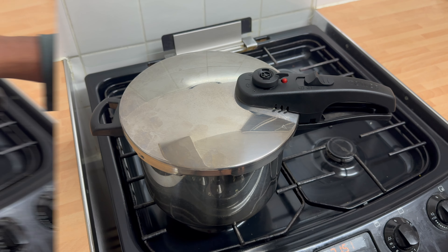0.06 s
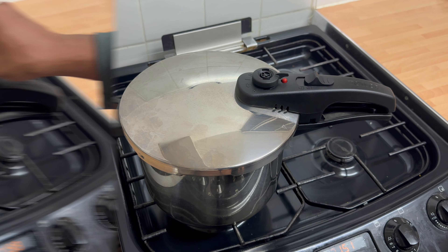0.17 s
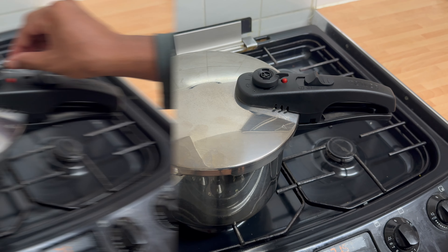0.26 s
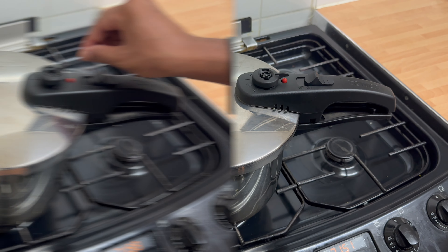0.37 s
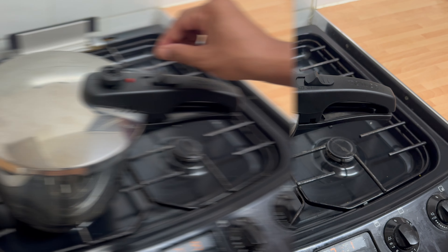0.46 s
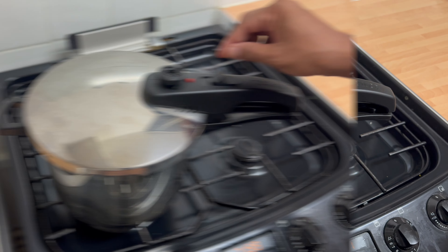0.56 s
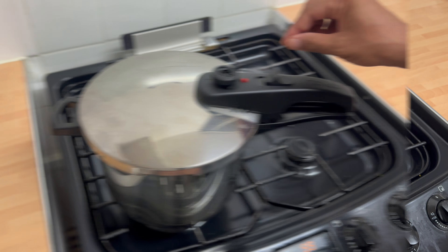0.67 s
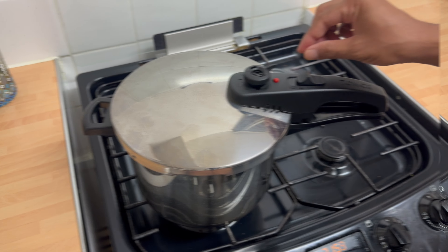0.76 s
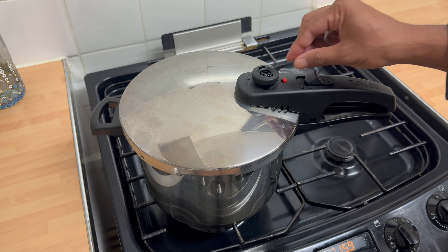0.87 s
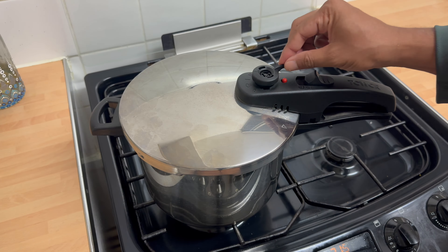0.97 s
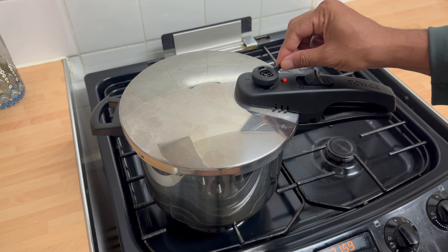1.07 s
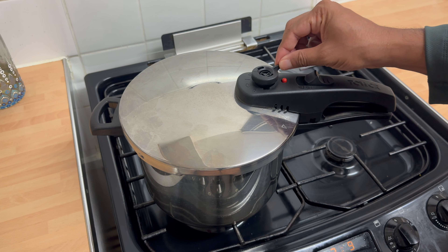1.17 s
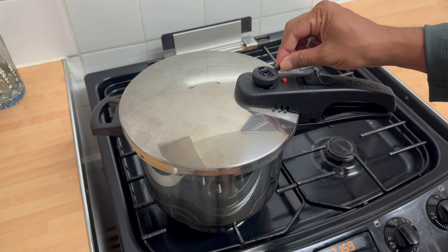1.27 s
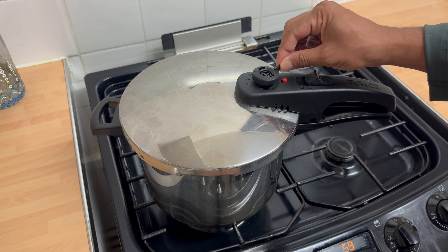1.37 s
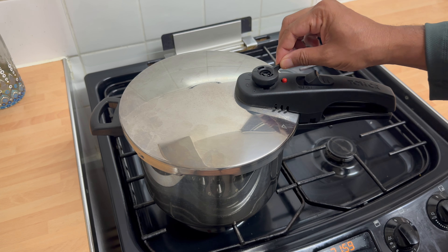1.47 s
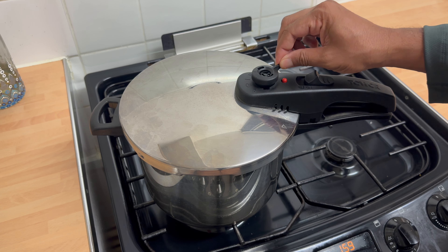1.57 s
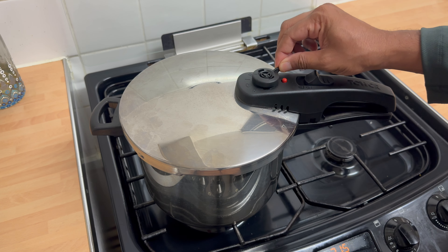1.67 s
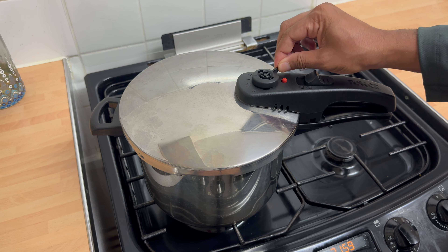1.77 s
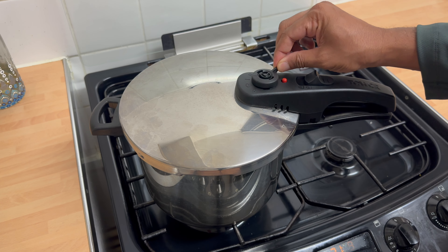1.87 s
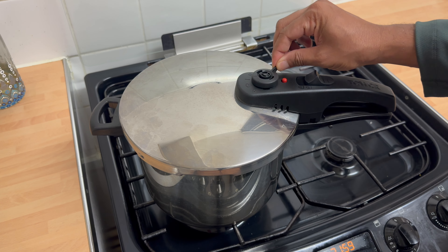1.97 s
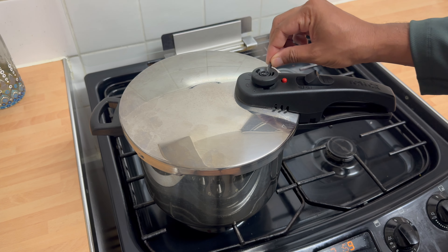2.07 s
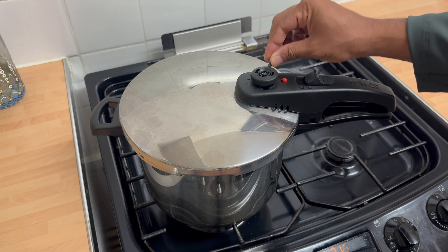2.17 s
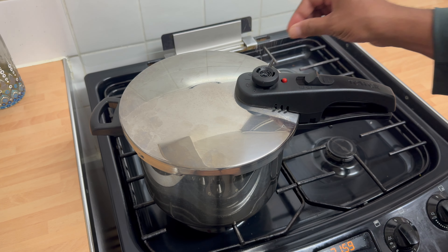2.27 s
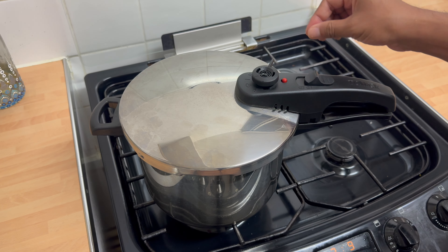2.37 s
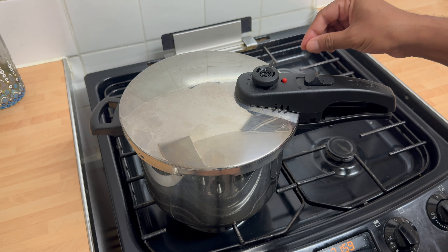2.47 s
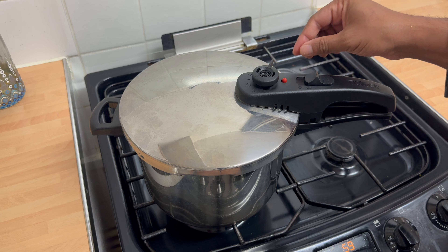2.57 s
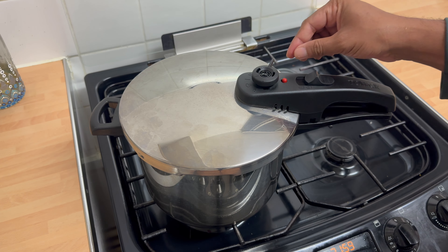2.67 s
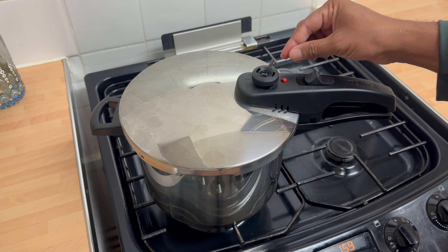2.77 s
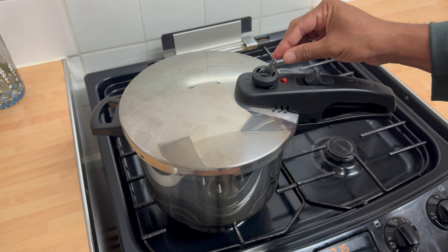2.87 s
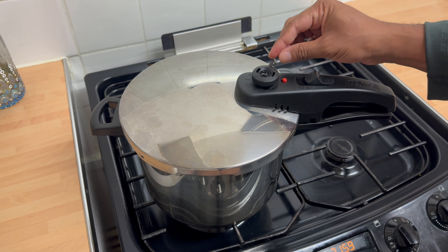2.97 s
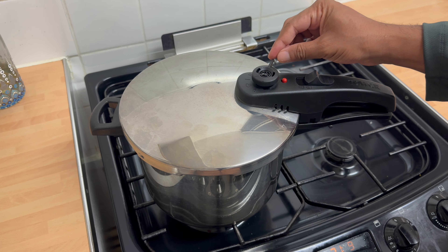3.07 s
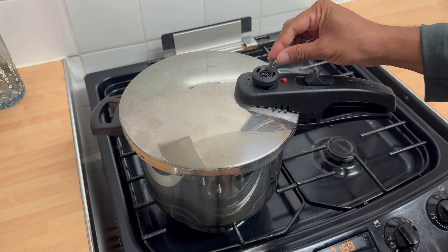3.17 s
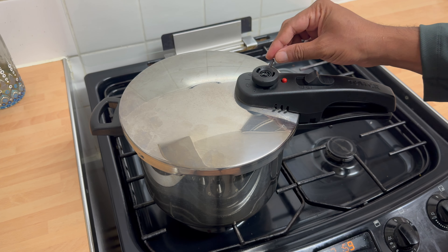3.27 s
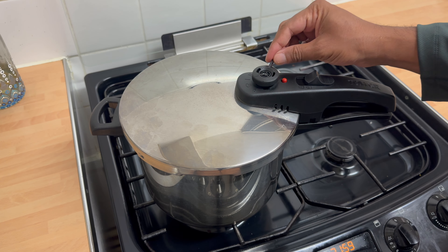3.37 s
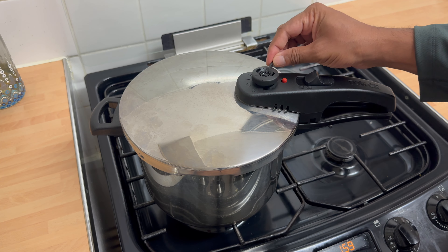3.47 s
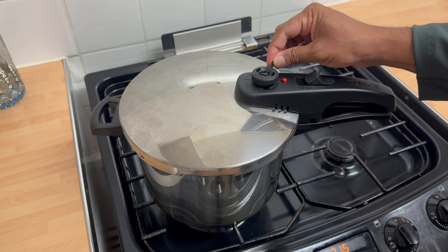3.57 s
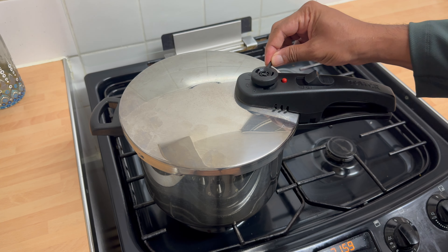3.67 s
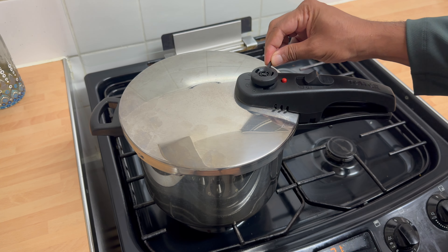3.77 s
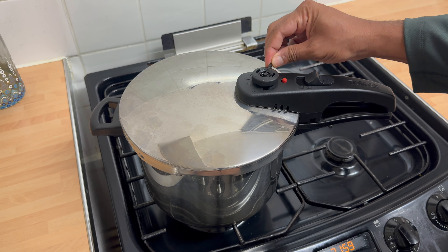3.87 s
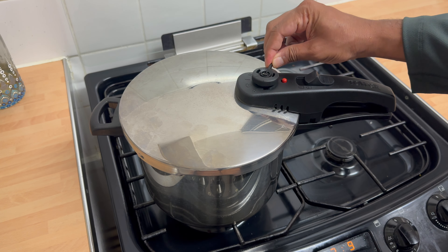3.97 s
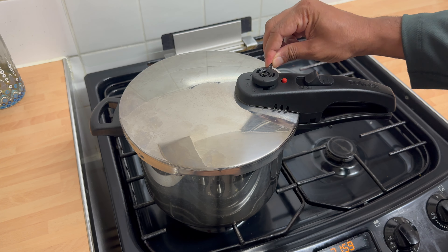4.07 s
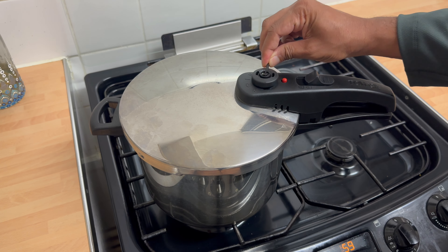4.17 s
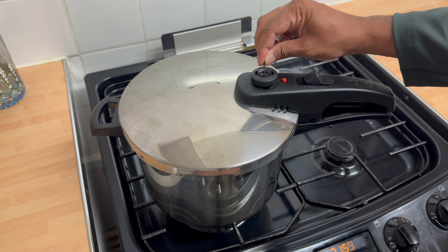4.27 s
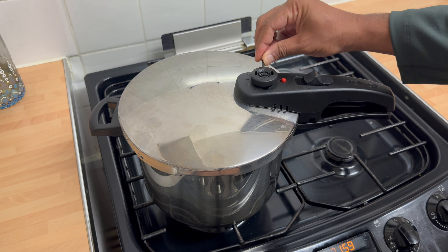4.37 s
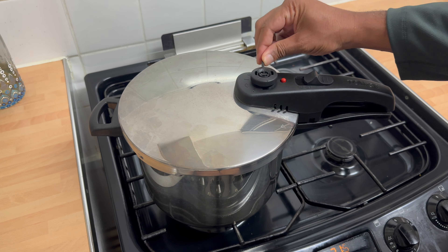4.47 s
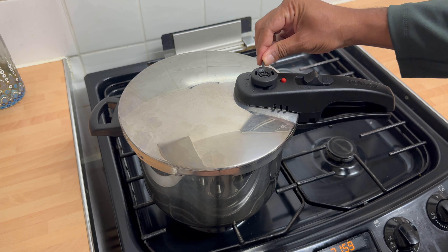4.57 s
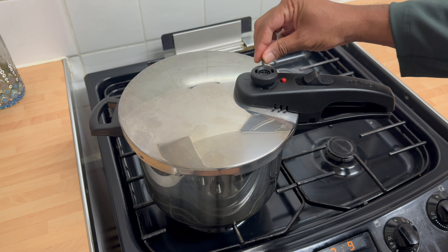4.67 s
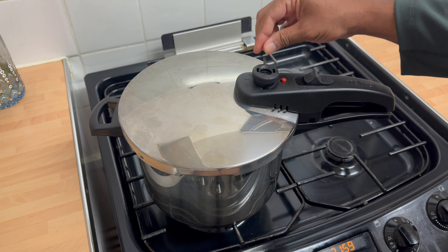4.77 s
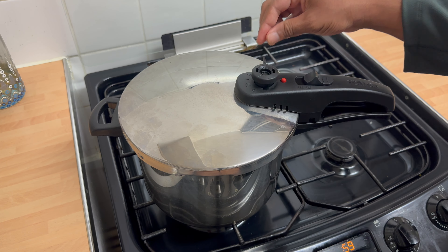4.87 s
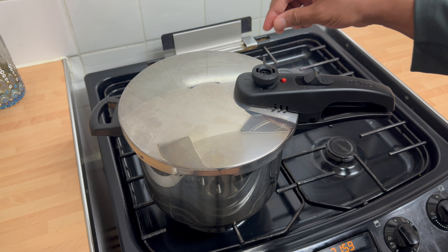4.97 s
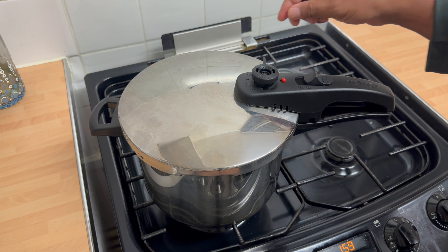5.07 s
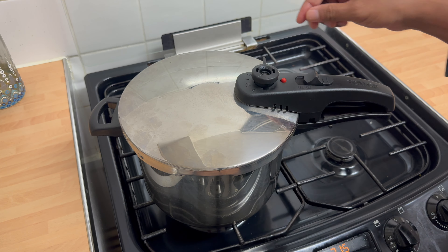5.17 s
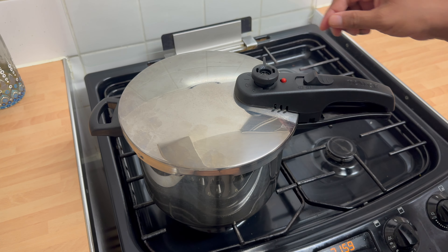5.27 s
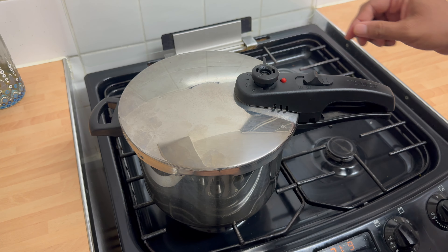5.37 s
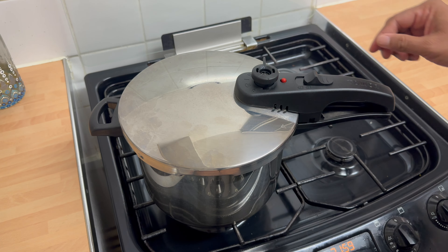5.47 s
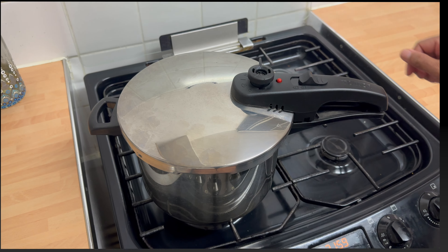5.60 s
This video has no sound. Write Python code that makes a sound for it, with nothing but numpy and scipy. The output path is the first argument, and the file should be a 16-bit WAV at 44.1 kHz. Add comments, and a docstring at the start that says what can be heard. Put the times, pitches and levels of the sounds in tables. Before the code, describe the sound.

Heard from above the stove, a pressure cooker leaks a faint hiss that fades out, then lets off two brief puffs of steam. The valve opens with a splutter of water and the jet hisses steadily, growing louder and faintly whistling before easing a little. Small spits of water and occasional dull, hollow bubble knocks from the pot come through, with a low simmer, a faint hum and a short kitchen echo.

```python
"""Steam escapes from a hot pressure cooker in a small kitchen while a hand works its valve.
A thin leak dies away, two short puffs follow, then the valve opens with a wet splutter and hisses on.
The jet of steam makes the hollows of the valve ring, and droplets spit through it.
Bubbles knock dully inside the pot, over a quiet simmer and a faint hum."""
import sys
import numpy as np
from scipy import signal
from scipy.fft import rfft, irfft
from scipy.io import wavfile

SR = 44100
rng = np.random.default_rng(int(sys.argv[2]) if len(sys.argv) > 2 else 0)


def unload_wav(signal):
    """Save mono or channel-first audio to the path in sys.argv[1] as 16-bit WAV at rate SR, clipped to [-1, 1]."""
    wavfile.write(
        sys.argv[1],
        SR,
        np.round(np.clip(np.atleast_2d(signal).T, -1, 1) * 32767).astype(np.int16),
    )


N = 248616

# Pitches at which the valve's cap and its bore (the tube inside) ring: f/Hz, width/Hz, relative level/dB
CAP_RESONANCES = [(1367, 49, -4.5), (1321, 158, -2.5), (1436, 43, -3.5), (1500, 33, -3), (1665, 180, -9),
                  (1743, 540, -11)]
BORE_RESONANCES = [(2686, 440, -5.5), (2950, 170, -5), (3123, 320, 1), (3493, 240, -1.5), (3420, 141, -25)]
# The hiss of small swirls of steam: f/Hz, relative level/dB
HISS_SPECTRUM = [(1500, -76), (3800, -27), (5200, -6.5), (7800, 7), (9400, 3.5), (11000, 0), (12900, 0.5),
                 (14000, 0.5), (16000, -5)]


def from_db(db):
    """Turn decibels into a factor to multiply by."""
    return 10 ** (np.asarray(db) / 20)


def in_time(points):
    """Join (time, value) points with straight lines, giving one value per sample."""
    times, values = np.transpose(points)
    return np.interp(np.arange(N) / SR, times, values)


def bin_hz():
    """The frequencies in the spectrum of the whole scene."""
    return np.maximum(np.arange(N // 2 + 1) * SR / N, 1)


def slope(points):
    """A smooth spectrum drawn through (frequency, level) points."""
    hz, db = np.transpose(points)
    return from_db(np.interp(np.log(bin_hz()), np.log(hz), db))


def resonances(modes):
    """A spectrum with a steep peak at each listed pitch; the powers of the peaks add."""
    peaks = (from_db(db) / (1 + (2 * (bin_hz() - hz) / width) ** 2) for hz, width, db in modes)
    return np.sqrt(sum(peak ** 2 for peak in peaks))


def coloured(x, spectrum):
    """Filter a signal with a spectrum, then scale it to an average power of 1."""
    filtered = irfft(rfft(x) * spectrum, N)
    return filtered / np.sqrt(np.mean(filtered ** 2) + 1e-20)


def drift(rate_hz):
    """A random wander of typical size 1, mostly slower than rate_hz."""
    return coloured(rng.standard_normal(N), 1 / (1 + (bin_hz() / rate_hz) ** 2))


def turbulence(spectrum, rough_db, rate_hz):
    """Swirling flow: noise that comes in uneven gusts, filtered with a spectrum."""
    gusts = rng.standard_normal(N) * from_db(rough_db * drift(rate_hz))
    return coloured(gusts, spectrum)


def opening(start_s, rise_s):
    """A smooth step from 0 to 1."""
    return np.sin(np.pi / 2 * np.clip((np.arange(N) / SR - start_s) / rise_s, 0, 1)) ** 2


def envelope(start_s, rise_s, hold_s, fall_db_per_s, level_db):
    """The loudness of one burst: it rises, holds, then fades evenly in decibels."""
    closing_s = np.maximum(np.arange(N) / SR - start_s - rise_s - hold_s, 0)
    return opening(start_s, rise_s) * from_db(level_db - np.minimum(fall_db_per_s * closing_s, 200))


def ring(clicks, hz, fade_s):
    """Each click starts a pure tone that fades by 60 dB in fade_s."""
    decay = from_db(-60 / (fade_s * SR))
    turn = 2 * np.pi * hz / SR
    return signal.lfilter([0, np.sin(turn)], [1, -2 * decay * np.cos(turn), decay * decay], clicks + 1e-18)


def kitchen(x, echo_db, fade_s=0.18):
    """Tiles and worktop add a dense tail of echoes; the total power stays about the same."""
    t = np.arange(SR // 2) / SR
    tail = rng.standard_normal(len(t)) * from_db(-60 * t / fade_s) * (t > .003)
    echoes = signal.fftconvolve(x, tail / np.linalg.norm(tail))[:N]
    echo_gain = from_db(echo_db)
    return (x + echo_gain * echoes) / np.sqrt(1 + echo_gain ** 2)


def background(noise_db=-70):
    """Room noise, simmering water and a faint wavering hum."""
    # The quiet kitchen and the simmer: f/Hz, relative level/dB
    quiet_spectrum = [(25, -8), (50, 0.5), (90, 2), (125, 1.5), (165, -2.5), (250, -2.5), (330, -2.5),
                      (500, 3), (650, -4), (850, -4), (2000, -10.5), (4000, -20.5), (16000, -25)]
    # The tones of the hum: f/Hz, relative level/dB
    hum_tones = [(123.8, -76.5), (242.2, -78.5)]
    t = np.arange(N) / SR
    hum = 0
    for hz, db in hum_tones:
        phase = 2 * np.pi * hz * t + 0.76 * drift(2.5)
        hum += from_db(db - 3.0) * np.sqrt(2) * np.sin(phase)
    return hum + from_db(noise_db) * coloured(rng.standard_normal(N), slope(quiet_spectrum))


def bubble_knocks(gain_db=-4, spread_db=0.5, rattle_db=-26, rattle_s=0.012, lowest_hz=430):
    """Collapsing bubbles set the pot ringing, each followed by a short rattle of smaller ones."""
    # Bubbles collapsing in the pot: t/s, relative level/dB
    bubbles = [(0.2, -60), (0.355, -48), (0.364, -44), (0.463, -57), (0.918, -61), (0.972, -53.5),
               (1.429, -49), (1.608, -53), (1.679, -48.5), (1.731, -56.5), (2.201, -39), (2.221, -42),
               (2.603, -53), (3.429, -45), (3.877, -45.5), (4.295, -37), (4.303, -62)]
    # The notes of the pot with its water: f/Hz, relative level/dB, time to fade by 60 dB/s
    pot_notes = [(470, -7, 0.042), (484.7, -2.5, 0.17), (520, -3, 0.034), (619, -3.5, 0.097),
                 (621.6, -5, 0.12), (706, -4.5, 0.085), (848, -3.5, 0.028), (1090, -11, 0.023),
                 (1460, -4, 0.057)]
    times, bubble_db = np.transpose(bubbles)
    starts = np.round(times * SR).astype(int)
    chance = rng.standard_normal((len(times), len(pot_notes)))
    ringing = np.zeros(N)
    for k, (hz, note_db, fade_s) in enumerate(pot_notes):
        clicks = np.zeros(N)
        clicks[starts] = from_db(bubble_db + note_db + gain_db + spread_db * chance[:, k])
        rattle_fade = signal.lfilter([1], [1, -np.exp(-1 / (rattle_s * SR))], clicks + 1e-18)
        rattle = from_db(rattle_db) * rattle_fade * rng.standard_normal(N)
        ringing += ring(clicks + rattle, hz, fade_s)
    # cut the bass so the knocks stay hollow, without a low thump
    bass_cut = signal.butter(4, lowest_hz, "high", fs=SR, output="sos")
    return kitchen(signal.sosfilt(bass_cut, ringing), echo_db=-0.5)


def droplet_spits(swell_s=0.0029):
    """Each droplet swells and bursts in the bore with a short bright sputter."""
    # Droplets spat through the valve: t/s, level/dB
    droplets = [(1.638, -48.5), (1.662, -51), (2.19, -31.5), (2.257, -31.5), (2.616, -43), (2.91, -35.5),
                (4.726, -36), (4.76, -38), (4.966, -39.5), (5.125, -38)]
    bursts = np.zeros(N)
    for start_s, db in droplets:
        age = np.maximum(np.arange(N) / SR - start_s, 0) / swell_s
        bursts += from_db(db) * age * np.exp(1 - np.minimum(age, 40))
    spectrum = resonances(BORE_RESONANCES) + resonances(CAP_RESONANCES) + 0.16 * slope(HISS_SPECTRUM)
    return kitchen(bursts * coloured(rng.standard_normal(N), spectrum), echo_db=-5.0)


def water_splutter():
    """Water that had gathered in the valve is torn up in the first rush of steam."""
    # Water blown out as the valve opens: t/s, rise/s, hold/s, fall/(dB per s), level/dB
    gushes = [(2.025, .026, 0.085, 400, -42), (2.15, .03, .08, 147.5, -57)]
    # The sound of spluttering water: f/Hz, relative level/dB
    water_spectrum = [(60, -24.5), (150, -24), (200, -13.5), (255, -10), (330, -6), (430, -4), (700, -1),
                      (1100, -13), (2000, -10.5), (6000, -20), (16000, -35)]
    loudness = sum(envelope(*gush) for gush in gushes)
    water = turbulence(slope(water_spectrum), rough_db=2.0, rate_hz=120)
    return kitchen(loudness * water, echo_db=4.5)


def edge_tones():
    """Breathy tones swell and fade as steam swirls at the edge of the changing gap."""
    # Each flare of tone: middle t/s, length/s, f/Hz, width/Hz, level/dB
    flares = [(1.205, .17, 11400, 900, -56), (1.39, 0.25, 12700, 1500, -53), (1.547, 0.089, 6250, 700, -67),
              (1.72, 0.16, 6800, 900, -65), (1.876, 0.14, 8200, 900, -67), (4.26, 0.24, 8600, 650, -42),
              (4.278, 0.45, 3370, 400, -44.5), (4.357, .17, 7300, 450, -40), (4.98, .07, 4232, 200, -45)]
    tones = np.zeros(N)
    for middle_s, length_s, hz, width, db in flares:
        half_s = length_s / 2
        swell = opening(middle_s - half_s, half_s) - opening(middle_s, half_s)
        tones += from_db(db) * swell * coloured(rng.standard_normal(N), resonances([(hz, width, 0)]))
    return tones


def valve_gains(easy_flow_db=-41.5):
    """How loud each part of the steam sound is over time: the powers of leak, puffs and jet add."""
    # The thin leak dying away: t/s, relative level/dB
    leak_curve = [(0, -48), (0.21, -50.5), (0.3, -48), (0.55, -59.5), (0.72, -70), (0.86, -87), (1.2, -120)]
    # Each nudge of the valve lets out a puff:
    # t/s, rise/s, hold/s, fall/(dB per s), relative level/dB, hollowness/dB, fizz/dB
    nudges = [(0.76, 0.041, 0.068, 16, -88.5, 31.5, 6), (1.119, 0.055, 0.022, 100, -45.5, 4.5, 1),
              (1.15, 0.081, 0.066, 122, -44, 0, -1), (1.317, 0.083, 0.031, 174, -55.5, 8.5, 8.5),
              (1.397, .05, 0.0043, 192, -47, 2, -1), (1.605, 0.053, 0.0067, 202, -49, -5.5, -4),
              (1.802, 0.12, .03, 103, -66, 10.5, 11), (1.968, 0.058, .03, 100, -46, 4.5, 8.5),
              (2.023, 0.027, 0.072, 110, -35.5, 15, 6), (2.115, 0.047, 0.038, 115.5, -32.5, 1, 3),
              (2.238, .02, .01, 109, -45, 15.5, 8)]
    # The jet swells above its easy flow when the fingers press harder: t/s, relative level/dB
    flow_curve = [(2.3, -44), (2.55, -42), (2.62, -41), (3.53, -41), (3.6, -34), (3.82, -34.5),
                  (4.06, -37.5), (4.36, -33.5), (4.53, -36), (4.76, -34.5), (4.82, -41.5), (4.94, -38),
                  (5.05, -40.5), (5.64, -41)]
    # How strongly each named part sounds: leaking/dB, puffing/dB, held open/dB, seated/dB,
    # then its share of the jet's swell, of a puff's hollowness and of a puff's fizz
    parts = {"cap": (-10.5, -17, -6, -9.5, 0.3, 1, 0), "bore": (-20.5, -17, -12, -5.5, 0.87, 0.5622, 0.5),
             "rush": (-12, -12.5, -6.5, -5.5, 0.43, 0.624, 0), "hiss": (-4.5, -7.5, -2, -3.5, 0.51, 0, 1),
             "rim": (-3, -30, -20.5, -17, 1.8, 0, 1), "lip": (-30, -4, -15.5, -11, 2, 0.1659, 0),
             "seat": (-27.5, -24, -14, -5, 0.54, 0, 0.5), "slit": (-6, -2, -1.35, -0.5, 0.98, 0, 0)}
    leak_db, swell_db = in_time(leak_curve), in_time(flow_curve) - easy_flow_db
    puffs = [(envelope(*shape), hollow_db, fizz_db) for *shape, hollow_db, fizz_db in nudges]
    opened = opening(start_s=2.1, rise_s=0.15)   # the steady jet sets in
    seated = opening(start_s=4.68, rise_s=0.11)   # the fingers let go and the cap settles on its seat
    gains = {}
    for part, (leaking_db, puffing_db, held_db, seated_db, swell, hollow, fizz) in parts.items():
        leak = from_db(leak_db + leaking_db)
        puff_power = sum((shape * from_db(puffing_db + hollow * hollow_db + fizz * fizz_db)) ** 2
                         for shape, hollow_db, fizz_db in puffs)
        position_db = (1 - seated) * held_db + seated * seated_db
        jet = opened * from_db(easy_flow_db + swell * swell_db + position_db)
        gains[part] = np.sqrt(leak ** 2 + puff_power + jet ** 2)
    return gains


def steam_jet(flutter_db=0.34):
    """Steam swirling at the slit makes the hollows of the valve ring; it all flutters with the flow."""
    # The rush of large swirls of steam: f/Hz, relative level/dB
    rush_spectrum = [(60, -37), (170, -11.5), (330, -10.5), (480, -6.5), (800, -1.5), (1100, 2),
                     (2300, -0.5), (3900, 4), (5200, 4.5), (7000, -9), (16000, -31)]
    # Peaks that colour the steam at the valve's rim, lip and seat: f/Hz, width/Hz, relative level/dB
    rim = [(4220, 170, 0.5), (4710, 330, -5.5), (6440, 1050, 1)]
    lip = [(1680, 270, -0.5), (3450, 200, -0.5), (4460, 230, -0.5), (4950, 140, 1), (6230, 1000, 5),
           (7430, 190, 3), (11200, 820, -5.5), (12850, 390, -6)]
    seat = [(3092, 120, -1), (2974, 62, -0.5), (4180, 150, -4), (12400, 2100, -12)]
    # Fixed narrow peaks that colour the bright hiss, from reflections off the pot and room:
    # f/Hz, width/Hz, relative level/dB
    reflection_peaks = [(4900, 80, -22), (5640, 64, 3), (6160, 190, -19), (5914, 270, 0), (6187, 110, 5.5),
                        (6570, 330, -11), (6590, 320, 3), (6880, 250, 3), (7060, 110, 3.5), (7060, 82, -15),
                        (7390, 92, 3.7), (7350, 140, 2), (7710, 410, 3.5), (8300, 220, -6.5),
                        (8330, 67, 1.5), (8770, 190, -7), (9000, 79, -1.5), (10440, 200, -8)]
    gain = valve_gains()
    cap = gain["cap"] * turbulence(resonances(CAP_RESONANCES), rough_db=1.5, rate_hz=130)
    bore = gain["bore"] * turbulence(resonances(BORE_RESONANCES), rough_db=2.0, rate_hz=200)
    rush = gain["rush"] * turbulence(slope(rush_spectrum), rough_db=1.5, rate_hz=62)
    hiss = gain["hiss"] * turbulence(slope(HISS_SPECTRUM), rough_db=0.5, rate_hz=360)
    colours = [("rim", rim), ("lip", lip), ("seat", seat), ("slit", reflection_peaks)]
    bright_hiss = sum(gain[part] * turbulence(resonances(peaks), rough_db=1.3, rate_hz=300)
                      for part, peaks in colours)
    jet = kitchen(cap + bore + rush + hiss + bright_hiss + edge_tones(), echo_db=-7.0)
    return jet * from_db(flutter_db * drift(rate_hz=40))


def scene():
    """All the sounds, heard from one spot above the stove, the same in both channels."""
    mono = steam_jet() + water_splutter() + droplet_spits() + bubble_knocks() + background()
    return np.array([mono, mono])


def record(dry, cutoff_hz=15800):
    """Cut off the very highest treble steeply."""
    treble_cut = signal.ellip(10, .05, 70, cutoff_hz, fs=SR, output="sos")
    return signal.sosfiltfilt(treble_cut, dry)


dry = scene()
out = record(dry)
unload_wav(out)
```